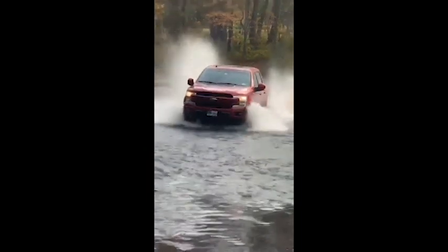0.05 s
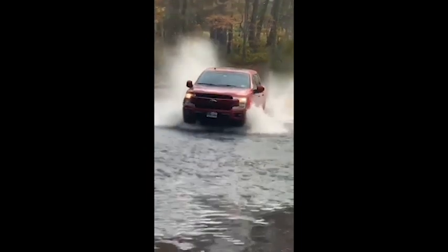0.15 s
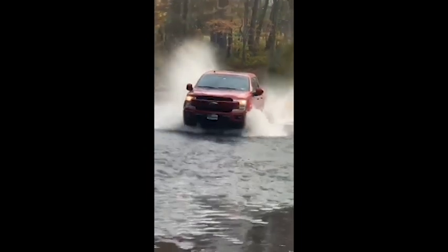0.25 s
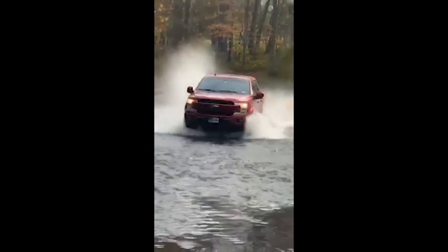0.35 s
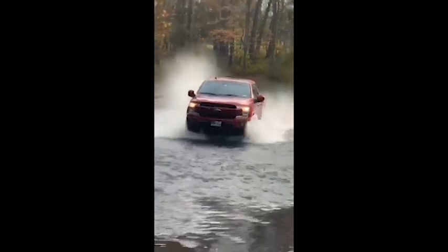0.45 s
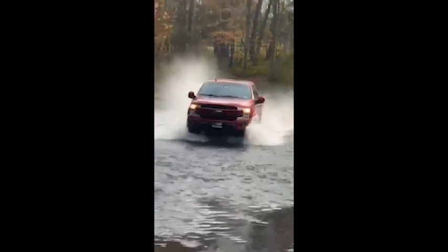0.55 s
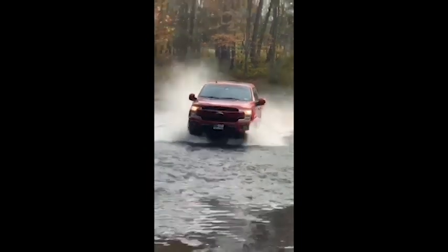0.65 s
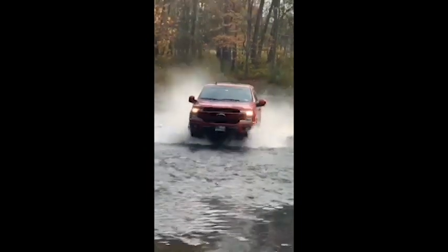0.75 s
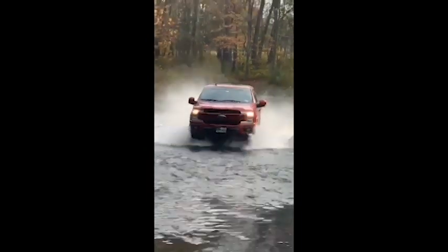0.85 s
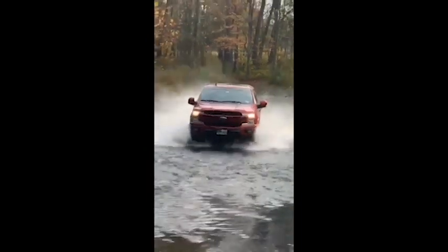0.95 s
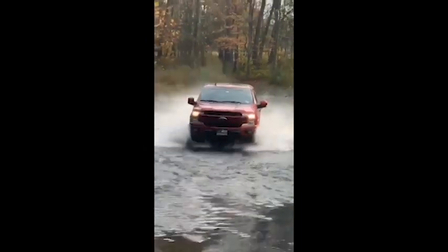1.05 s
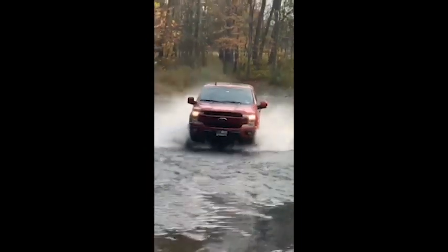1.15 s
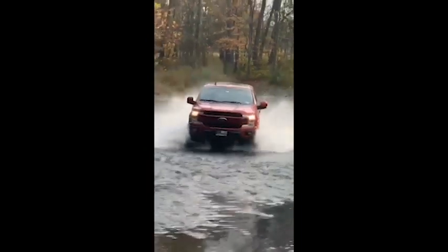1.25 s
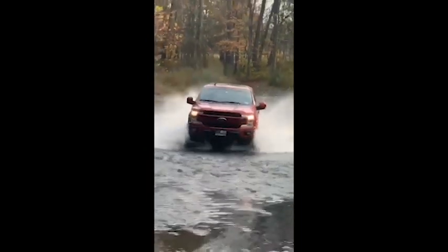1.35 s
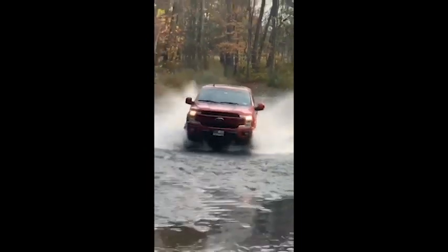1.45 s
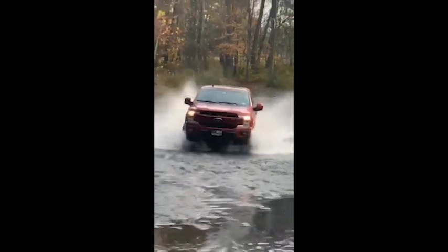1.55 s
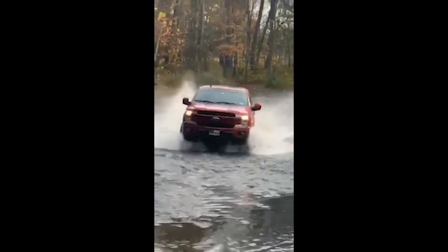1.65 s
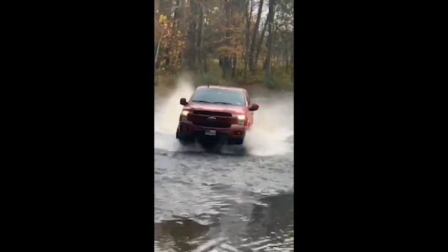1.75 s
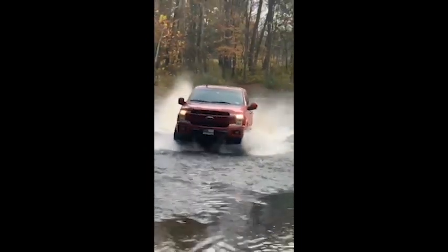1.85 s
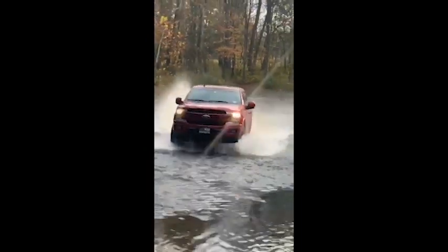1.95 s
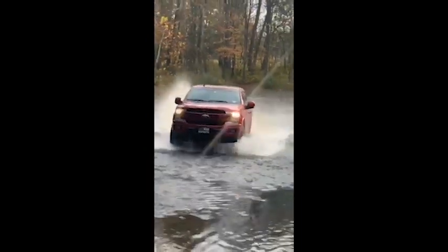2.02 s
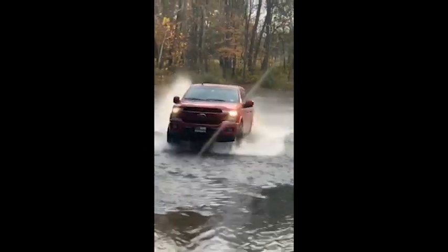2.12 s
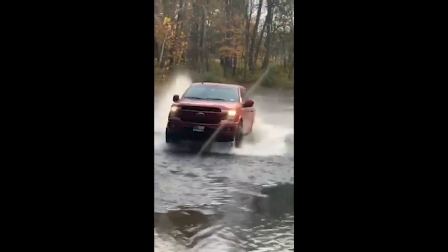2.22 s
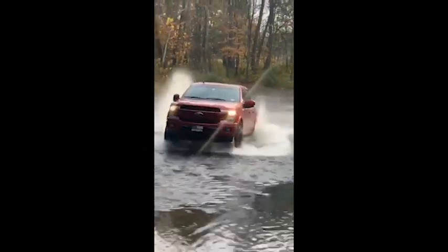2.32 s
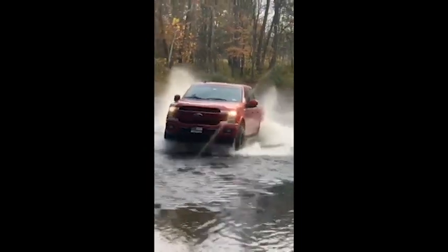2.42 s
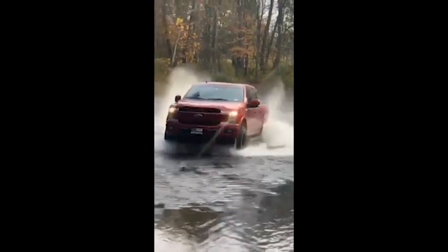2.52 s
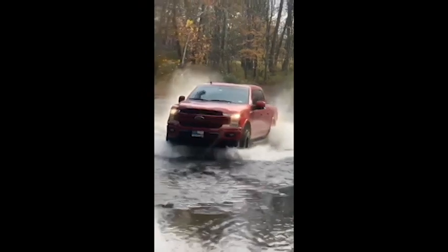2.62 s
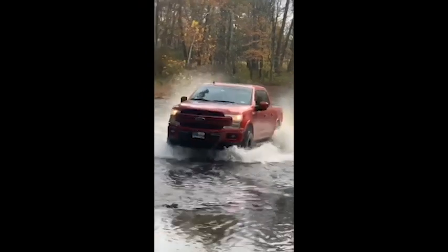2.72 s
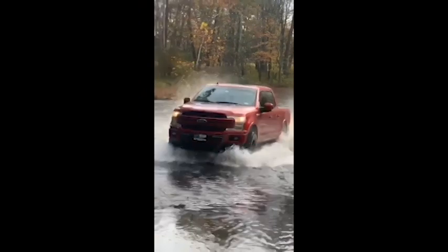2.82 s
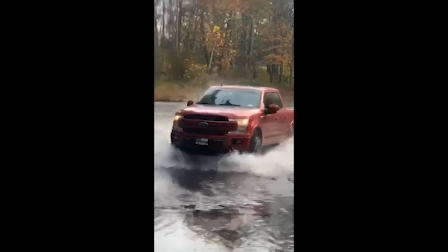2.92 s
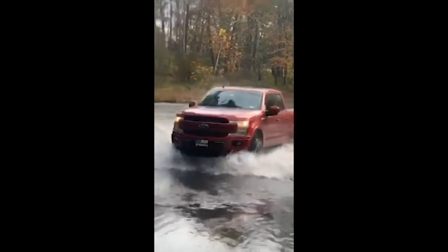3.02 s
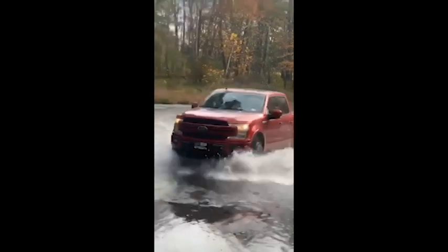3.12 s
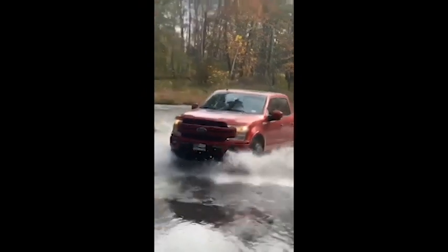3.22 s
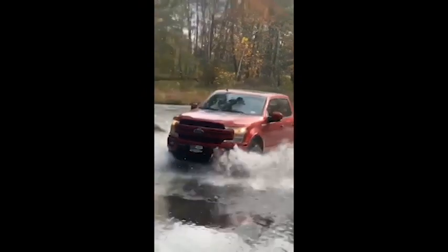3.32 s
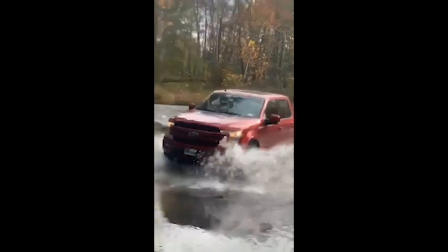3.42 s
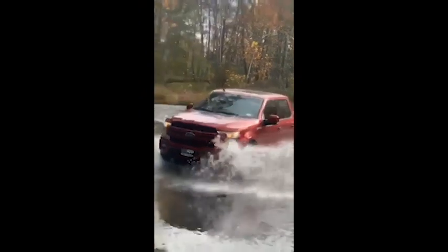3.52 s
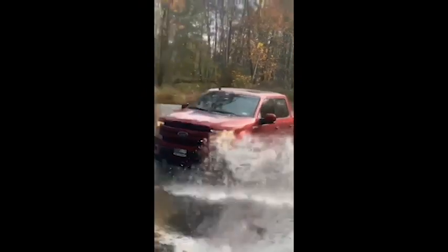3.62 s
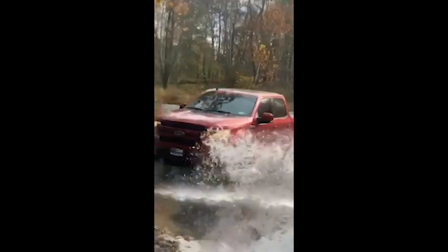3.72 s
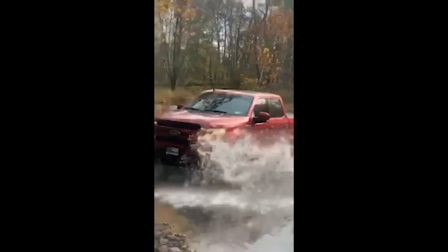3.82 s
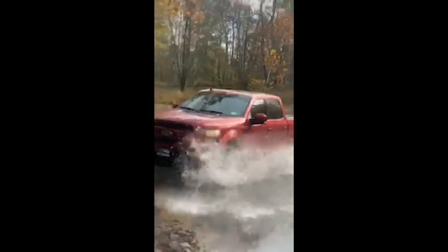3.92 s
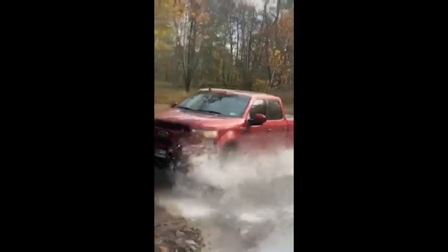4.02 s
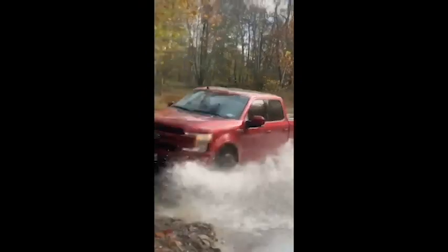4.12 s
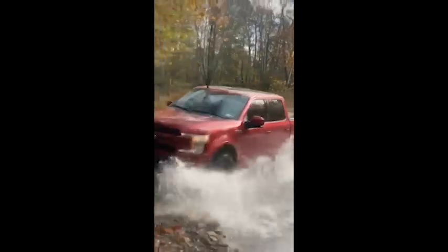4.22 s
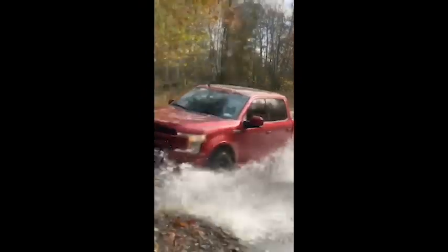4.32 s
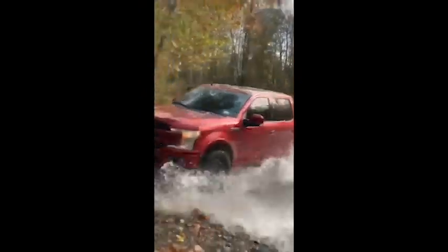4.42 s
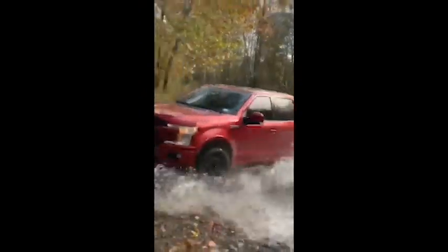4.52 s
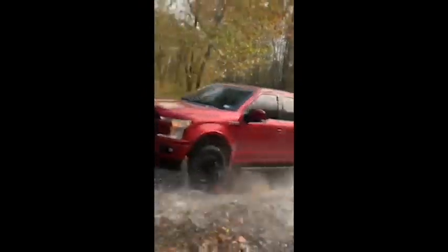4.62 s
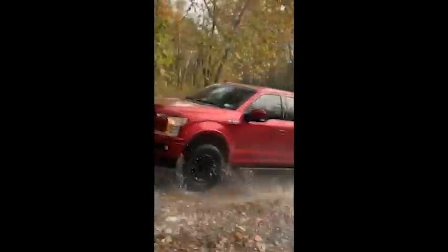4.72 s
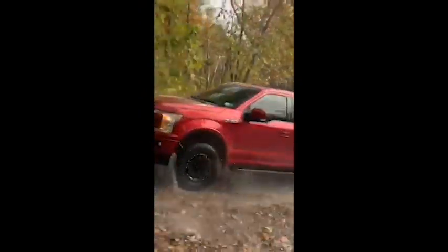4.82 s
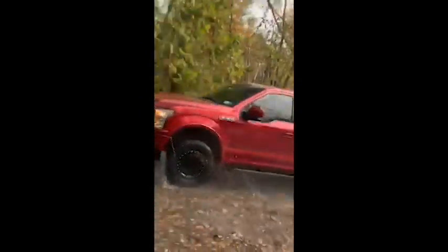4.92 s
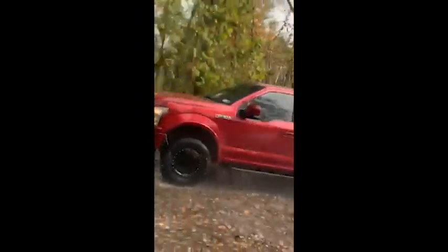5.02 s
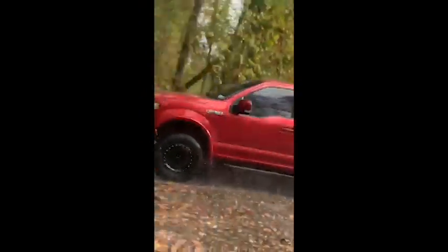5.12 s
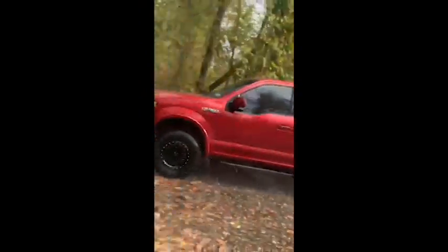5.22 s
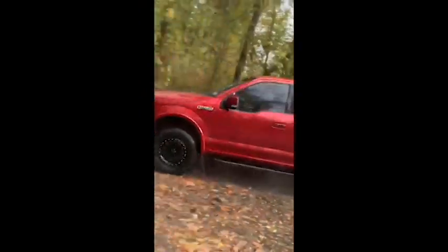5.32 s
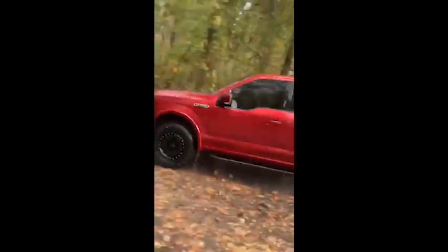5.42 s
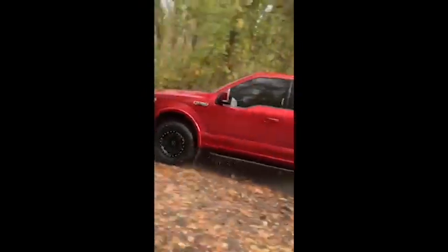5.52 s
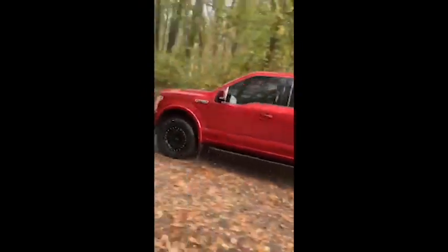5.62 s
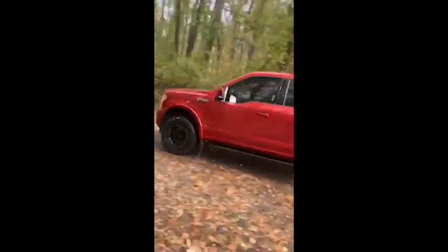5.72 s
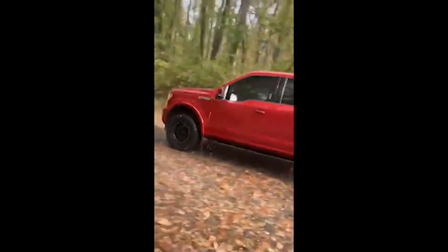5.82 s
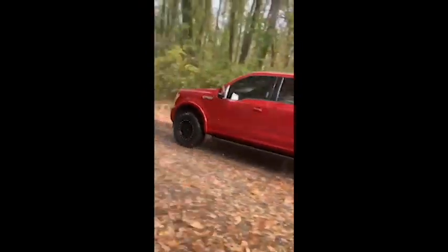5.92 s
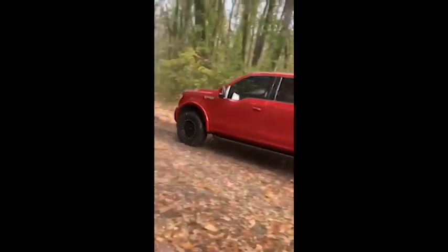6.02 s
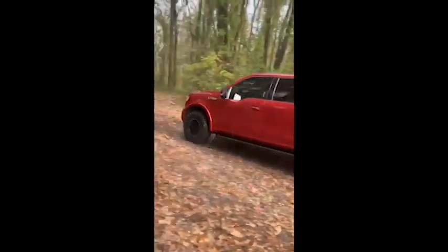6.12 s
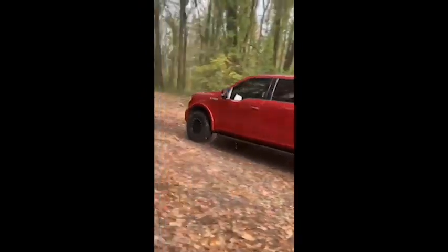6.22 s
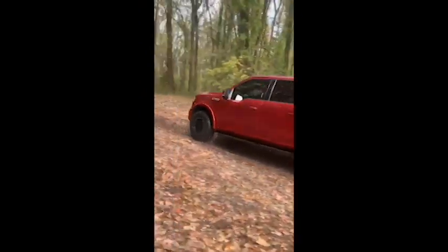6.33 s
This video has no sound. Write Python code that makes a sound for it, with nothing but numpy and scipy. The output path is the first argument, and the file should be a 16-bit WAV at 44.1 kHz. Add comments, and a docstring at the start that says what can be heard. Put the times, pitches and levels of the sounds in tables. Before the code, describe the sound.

Continuous churning water and a low, throbbing truck engine come nearer across a creek, captured close by on a small microphone with a hollow, slightly rough colour. Low booming beats on the wheel wells rise in pitch as bright slaps and spray increase. The loudest moment comes about five seconds in, with a heavy underbody blow; afterwards gritty crunches, small stone knocks and thinning spray replace the splash on the bank.

```python
"""A pickup fords a shallow creek, passes close by and climbs out onto a gravel track.
Thrown water drums on the underbody and falls back in splashes and spray: impact noise rung in bands of filters.
Slaps, thumps, gulped air and knocking stones are damped rings; the engine is a train of uneven pulses over rumble.
On the bank the spray thins out and the wet tyres crunch over stones, as bursts of filtered cracks."""
import sys
import numpy as np
from scipy import signal
from scipy.io import wavfile
from scipy.ndimage import uniform_filter1d

SR = 44100
rng = np.random.default_rng(int(sys.argv[2]) if len(sys.argv) > 2 else 0)


def materialize(psi):
    """Save the field psi as 16-bit PCM at rate SR to the path in sys.argv[1].

    A 1-D psi becomes a single channel; in a 2-D psi each row is a channel.
    """
    bounded = np.clip(np.atleast_2d(psi).T, -1, 1)
    quanta = np.round(bounded * 32767).astype(np.int16)
    wavfile.write(sys.argv[1], SR, quanta)


N = 280476

# the pass: moment when the truck is nearest, its distance then, its speed
CLOSEST_S, CLOSEST_M, SPEED_M_PER_S = 4.934, 2.146, 4.45
# the tyres climb out of the water: middle of the climb, time scale of the climb
ASHORE_S, CLIMB_S = 5.606, 0.44


def from_db(db):
    """Amplitude gain is ten to the power of a twentieth of the decibels."""
    return 10 ** (np.asarray(db) / 20)


def rms_one(x):
    """Normalisation by the root of the mean power gives unit rms."""
    return x / np.sqrt(np.mean(x ** 2) + 1e-20)


def in_time(rows):
    """Linear interpolation carries each column of a curve to every sample."""
    s, *columns = np.transpose(rows)
    return [np.interp(np.arange(N) / SR, s, c) for c in columns]


def drift(rate_hz):
    """Noise through a critically damped low-pass wanders slowly; rms 1."""
    step = 40  # samples between computed points
    r = np.exp(-2 * np.pi * rate_hz * step / SR)
    noise = rng.standard_normal(N // step + 2002)
    slow = signal.lfilter([1], [1, -2 * r, r * r], noise)[2000:]  # settled part only
    return np.interp(np.arange(N) / step, np.arange(len(slow)), rms_one(slow))


def band(x, low_hz, high_hz):
    """A Butterworth band-pass keeps only the energy between two frequencies."""
    sos = signal.butter(2, [low_hz, high_hz], "band", fs=SR, output="sos")
    return signal.sosfilt(sos, x + 1e-18)


def held(x, seconds=0.076):
    """Division by the short-term rms keeps loudness even over this span, while faster flutter remains."""
    power = np.abs(uniform_filter1d(x ** 2, max(int(seconds * SR), 2)))
    return x / np.sqrt(power + 1e-12)


def swell(s, db, half_s):
    """A Gaussian in time makes a bell-shaped rise (or dip, if db is negative) of the level."""
    return db * np.exp(-((np.arange(N) / SR - s) / half_s) ** 2)


def moving_peak(x, hz, width_hz, db, size=2048):
    """A second-order resonance makes a peak or notch whose centre and height move block by block."""
    half = np.pi * width_hz / SR
    out, state = np.zeros(N), np.zeros(2)
    for i in range(0, N, size):
        c = -2 * np.cos(2 * np.pi * hz[i] / SR)
        g = from_db(db[i] / 2)
        zeros, poles = [1 + half * g, c, 1 - half * g], [1 + half / g, c, 1 - half / g]
        out[i:i + size], state = signal.lfilter(zeros, poles, x[i:i + size], zi=state)
    return out


def distance_db(lag_s=0):
    """Spherical spreading: pressure falls as one over distance; 0 dB at the nearest point, lag_s late."""
    along_m = SPEED_M_PER_S * (np.arange(N) / SR - CLOSEST_S - lag_s)
    return -20 * np.log10(np.hypot(1, along_m / CLOSEST_M))


def ashore(lag_s=0):
    """A sigmoid in time goes smoothly from 0 in the creek to 1 on the bank."""
    return .5 + .5 * np.tanh(2 * (np.arange(N) / SR - ASHORE_S - lag_s) / CLIMB_S)


def impacts(per_s, spread_db):
    """Poisson-like arrivals: clicks of either sign, sizes scattered exponentially in dB; rms 1."""
    at = np.flatnonzero(rng.random(N) < per_s / SR)
    size_db = spread_db * np.minimum(rng.exponential(1, len(at)), 4)
    clicks = np.zeros(N)
    clicks[at] = from_db(size_db) * rng.choice([-1, 1], len(at))
    return rms_one(clicks)


def shower(tone, share, per_s, spread_db, patchy_db, surge_db, colour=lambda hz: 0, count=8):
    """Shot noise: impacts ring in a row of bands over a blur of noise; colour(hz) adds moving dB."""
    hz, tone_db = np.transpose(tone)
    edges = np.geomspace(hz[0], hz[-1], count + 1)
    out, power = 0, 0
    for low, high in zip(edges, edges[1:]):
        centre = np.sqrt(low * high)
        blur = np.sqrt(1 - share) * rng.standard_normal(N)
        drive = blur + np.sqrt(share) * impacts(per_s, spread_db)
        band_db = np.interp(np.log(centre), np.log(hz), tone_db) + colour(centre)
        gain = np.sqrt(high - low) * from_db(band_db)
        patches = from_db(patchy_db * drift(15.0))
        out = out + gain * rms_one(band(drive, low, high) * patches)
        power = power + gain ** 2
    return held(out / np.sqrt(power) * from_db(surge_db))


def blows(rows, ring_cycles, rise_cycles, scatter_s, scatter_db, scatter_octaves):
    """Damped resonance: a ring falls 60 dB in ring_cycles after a soft rise, with noise around its pitch."""
    out, t = np.zeros(N + SR), np.arange(SR // 4) / SR
    reach = 2 ** (scatter_octaves / 2)
    for s, level_db, hz in rows:
        ring = np.sin(2 * np.pi * hz * t) * from_db(-60 * t * hz / ring_cycles)
        noise = rms_one(band(rng.standard_normal(len(t)), hz / reach, hz * reach))
        scatter = noise * from_db(scatter_db - 60 * t / scatter_s)
        rise = 1 - np.exp(-(t * hz / rise_cycles) ** 2)
        blow, at = (ring + scatter) * rise, round(s * SR)
        out[at:at + len(t)] += from_db(level_db) * blow / np.abs(blow).max()
    return out[:N]


def patter(per_s, spread_db, decay_s, low_hz, high_hz):
    """Noise under exponential decays: sudden bursts at random moments, each falling 60 dB in decay_s; rms 1."""
    clicks = np.abs(impacts(per_s, spread_db)) + 1e-18
    bursts = signal.lfilter([1], [1, -from_db(-60 / (decay_s * SR))], clicks)
    return rms_one(band(bursts * rng.standard_normal(N), low_hz, high_hz))


def engine():
    """Pulse-train excitation: uneven firings boom in the exhaust over chassis rumble that deepens ashore."""
    # how hard the engine and chassis work: start_s, effort_db
    effort_curve = [(0, 0), (.45, -4), (1.0, -1), (1.7, 2), (2.05, 0.5), (2.5, 3), (3.05, -1), (3.65, -2),
                    (4.15, 1.5), (5.25, 0), (5.85, -5), (6.36, -6)]
    # relative rumble spectrum per Hz: frequency_hz, level_db
    rumble_tone = [(20, -25), (32, -10.5), (45, -4), (65, -2.5), (88, 2.5), (115, -5.5), (160, -15)]
    effort_db, = in_time(effort_curve)
    firing_hz = 67.8 - 0.25 * effort_db  # slower under more effort
    turns = np.cumsum(firing_hz * (1 + 0.0606 * drift(7.17))) / SR
    firings = np.diff(np.floor(turns), prepend=0) * from_db(3.7 * drift(29))
    exhaust = rms_one(band(firings, 48, 92))
    tilt_db = 1.0 - 4.9 * ashore(lag_s=-0.71)  # per octave
    rumble = shower(rumble_tone, share=0.22, per_s=60, spread_db=-0.5, patchy_db=0.5, surge_db=0,
                    colour=lambda hz: tilt_db * np.log2(hz / 65), count=7)
    level_db = -24.0 + 0.29 * distance_db() + effort_db + 0.75 * drift(8.3)
    return from_db(level_db) * held(from_db(-5.5) * exhaust + rumble, seconds=0.092)


def jolts():
    """Low structural modes: the chassis shudders over bumps in the bed and the bank."""
    # bumps, levels relative: start_s, level_db, pitch_hz
    bumps = [(3.13, -21, 72), (3.93, -18, 67.5), (4.92, -17, 69), (5.13, -14, 70), (5.35, -19, 68.5),
             (5.51, -17, 66.5)]
    return from_db(-2.0) * blows(bumps, ring_cycles=16, rise_cycles=3.6,
                                 scatter_s=0.2, scatter_db=-11, scatter_octaves=.8)


def crackle():
    """Brittle fracture: dry leaves and small stones snap in brief noise bursts once the tyres are ashore."""
    snaps = patter(per_s=35, spread_db=1.2, decay_s=0.015, low_hz=1300, high_hz=4300)
    return from_db(-35 + distance_db()) * ashore(lag_s=-0.23) * snaps


def crunches(decay_s=0.06, rise_s=0.0014, width_octaves=0.81, grains_per_s=2500):
    """Granular noise: a faint high tick, then grit crunches, each a short, dying run of cracks."""
    # a faint high tick, then grit cracking under the tyres, levels relative: start_s, level_db, pitch_hz
    crunch_rows = [(4.735, -20, 5000), (5.222, -7.5, 3600), (5.377, -11, 3600), (5.497, -13, 1950),
                   (5.604, -16, 2600), (5.622, -15, 2280), (5.786, -17.5, 2200), (5.798, -21, 3980),
                   (5.871, -27, 1900), (5.944, -25.5, 2150), (6.033, -28, 5160), (6.055, -30, 3800),
                   (6.070, -28, 3800), (6.149, -23, 2060), (6.164, -24.5, 3500), (6.277, -31, 3950),
                   (6.328, -34, 4100)]
    out, t = np.zeros(N + SR), np.arange(SR // 4) / SR
    reach = 2 ** (width_octaves / 2)
    envelope = from_db(-60 * t / decay_s) * (1 - np.exp(-t / rise_s))
    for s, level_db, hz in crunch_rows:
        cracks = (rng.random(len(t)) < grains_per_s / SR) * rng.standard_normal(len(t))
        crunch, at = band(cracks * envelope, hz / reach, hz * reach), round(s * SR)
        out[at:at + len(t)] += from_db(level_db) * crunch / np.abs(crunch).max()
    return from_db(-6.5) * out[:N]


def stones():
    """Impact of solids: stones knock under the tyres as short, strongly damped rings."""
    # knocks, levels relative: start_s, level_db, pitch_hz
    knocks = [(5.036, -2, 690), (5.052, -1.5, 706), (5.080, -5, 690), (5.143, -7, 720), (5.158, -4, 725),
              (5.620, -12, 1370), (5.787, -11.5, 1390), (5.994, -14, 634), (6.002, -7.5, 665),
              (6.022, -19, 660), (6.107, -18, 1370), (6.117, -18, 1250), (6.149, -14, 1290),
              (6.158, -21, 1400), (6.262, -23, 740), (6.299, -22, 720), (6.345, -24, 750)]
    return from_db(-7) * blows(knocks, ring_cycles=15, rise_cycles=1.55,
                               scatter_s=0.069, scatter_db=-15.5, scatter_octaves=1.0)


def spatter():
    """Discrete drop impacts: lumps of water land one by one while the truck is in the creek."""
    lumps = patter(per_s=60, spread_db=.6, decay_s=.025, low_hz=700, high_hz=2110)
    return from_db(-30 + distance_db()) * (1 - ashore()) * lumps


def spray(grain):
    """Dense drop impacts merge into hiss: droplets patter, the finest fizz, and both thin out ashore."""
    # relative spectra per Hz: frequency_hz, level_db
    spray_tone = [(1800, -9), (2500, 1), (3100, 1), (4100, -1), (5200, -3), (6300, -6), (7500, -16.5)]
    mist_tone = [(5500, -15), (7000, 10), (8000, 8), (9500, -23)]
    # bursts of spray flung towards the microphone: centre_s, swell_db, half_length_s
    spray_bursts = [(3.664, 1.5, 0.024), (4.372, 2.5, 0.073), (4.946, 1, 0.036), (5.232, 3, 0.037),
                    (5.8, 5, .02)]
    # fine mist flicked off the treads: centre_s, swell_db, half_length_s
    mist_flicks = [(4.348, 2, 0.085), (5.378, 6, .03), (5.49, 6, .04), (5.716, 7, 0.055),
                   (5.95, 4.5, 0.014), (6.038, 2, .012)]
    # both hang in the air before they land, so their levels lag the truck
    spray_hang_s, mist_hang_s = 0.084, 0.2
    near_db, dried = distance_db(spray_hang_s), ashore(lag_s=0.16)
    tilt_db = 0.5 + 0.13 * near_db - 2.2 * dried  # per octave
    flutter = drift(25) + .6 * drift(4)
    drops = shower(spray_tone, grain, per_s=1300, spread_db=1.0, patchy_db=1.45, surge_db=.35 * flutter,
                   colour=lambda hz: tilt_db * np.log2(hz / 4000), count=10)
    mist = shower(mist_tone, grain, per_s=1800, spread_db=2.0, patchy_db=3.0,
                  surge_db=0.53 * flutter, count=4)
    bursts_db = sum(swell(*burst) for burst in spray_bursts)
    flicks_db = sum(swell(*flick) for flick in mist_flicks)
    drops_db = -29.5 + 0.55 * near_db - 9.7 * dried + bursts_db
    mist_db = -39.5 + 1.02 * distance_db(mist_hang_s) - 5.8 * dried + flicks_db
    return from_db(drops_db) * drops + from_db(mist_db) * mist


def slaps():
    """Trapped-air resonance: sheets of water slap down and the air beneath them rings."""
    # slaps, levels relative: start_s, level_db, pitch_hz of the trapped air
    sheets = [(2.786, -27, 1900), (2.931, -21, 1190), (3.284, -16, 1160), (3.400, -20.5, 720),
              (3.402, -18, 1230), (3.542, -18, 1950), (3.593, -19, 1180), (3.628, -20, 1330),
              (3.631, -21, 1950), (3.843, -15.5, 1140), (3.893, -23, 1940), (3.900, -18.5, 716),
              (3.948, -20, 763), (3.953, -9.5, 1170), (4.070, -21, 2090), (4.221, -13.5, 743),
              (4.224, -18, 2040), (4.357, -16, 1930), (4.394, -18, 754), (4.396, -12, 1193),
              (4.456, -10, 1315), (4.465, -17, 735), (4.577, -14, 740), (4.594, -9.5, 1250),
              (4.666, -16, 1246), (4.753, -14.5, 2020), (4.790, -10.5, 1265), (4.865, -13, 714),
              (4.899, -18, 2000), (4.930, -12, 1260), (5.052, -15, 1280), (5.101, -13, 1260),
              (5.116, -13, 2040), (5.135, -17, 2090), (5.14, -16, 1360), (5.288, -12, 1200),
              (5.520, -18, 1257)]
    return from_db(-3.0) * blows(sheets, ring_cycles=29, rise_cycles=2.7,
                                 scatter_s=0.11, scatter_db=-14.5, scatter_octaves=1.0)


def gulps():
    """Bubble resonance: pockets of air gulped under the wheel wells each sound a short low note."""
    # air pockets, levels relative: start_s, level_db, pitch_hz
    pockets = [(.765, -20, 126), (1.43, -15.5, 210.6), (1.665, -15, 150), (2.05, -15, 219.6),
               (2.16, -10.5, 200), (2.345, -14.5, 278), (2.57, -15, 253), (2.64, -18, 262),
               (3.80, -15.5, 311), (3.88, -20, 321), (4.075, -19, 282), (4.455, -10.5, 298),
               (4.57, -12.5, 216.2), (4.62, -11, 318), (4.76, -16, 297), (4.82, -12.5, 340),
               (4.97, -17, 340)]
    return from_db(-2.0) * blows(pockets, ring_cycles=45, rise_cycles=5.7,
                                 scatter_s=0.25, scatter_db=-12, scatter_octaves=0.37)


def thumps():
    """Struck-panel modes: heavy blows on the underbody ring for only a few cycles."""
    # blows, levels relative: start_s, level_db, pitch_hz
    underbody = [(.408, -13, 200), (.824, -14, 150), (1.030, -13, 204), (1.528, -10, 184),
                 (1.766, -11.5, 175), (1.944, -9.5, 214), (2.234, -10, 220), (2.363, -9.5, 160),
                 (2.378, -4, 253), (2.790, -14.5, 225), (3.259, -9, 255), (3.755, -9, 256),
                 (3.908, -9, 350), (3.997, -6.5, 216), (4.258, -5, 228), (4.447, -7.5, 256),
                 (4.620, -5.5, 253), (4.734, -5.5, 256), (4.818, -7.5, 150), (5.147, -13, 302),
                 (5.171, 3, 350), (5.604, -12, 245), (5.915, -14.5, 240), (6.003, -20, 420)]
    return from_db(-2.0) * blows(underbody, ring_cycles=8.2, rise_cycles=0.6,
                                 scatter_s=0.059, scatter_db=-11.0, scatter_octaves=1.6)


def splash(churn_db, grain):
    """Many bubble resonances: torn water falls back in clumps of short rings, grainier on the bank."""
    # relative spectrum per Hz: frequency_hz, level_db
    splash_tone = [(300, -5.5), (480, 2.5), (680, -0.5), (1000, -4), (1350, -5), (1900, -6.5),
                   (2400, -12.5), (3200, -24.5)]
    near_db = distance_db()
    # per octave: big, low bubbles carry best close by; the tyres flick finer water as they climb out
    tilt_db = -.2 - 0.035 * near_db + swell(ASHORE_S, db=3.5, half_s=0.19)
    # each clump lands at once and trickles away
    clump_s, clump_share = .012, .09
    clump_starts = np.abs(impacts(per_s=24, spread_db=-1.5))
    landings = signal.lfilter([1], [1, -np.exp(-1 / (clump_s * SR))], clump_starts)
    clumps_db = 20 * np.log10(1 + clump_share * rms_one(landings)) + .5 * drift(35)
    bubbles = shower(splash_tone, grain, per_s=350, spread_db=0.0, patchy_db=0.6, surge_db=clumps_db,
                     colour=lambda hz: tilt_db * np.log2(hz / 1000), count=12)
    return from_db(-19.0 + 0.96 * near_db + churn_db + .5 * drift(12)) * bubbles


def drumming(churn_db):
    """Cavity resonance: slugs of water beat on booming wheel wells, harder in tone as the truck nears."""
    # relative spectrum per Hz: frequency_hz, level_db
    drum_tone = [(70, -19), (100, -0.5), (140, -1), (210, 0), (290, -2.5), (380, -6.5), (480, -10),
                 (620, -21)]
    # centre of the boom before it wanders: start_s, pitch_hz
    boom_curve = [(0, 158), (.7, 132), (1.8, 183), (2.2, 208), (2.5, 264), (3.8, 304), (4.1, 262),
                  (4.5, 306), (5.15, 347), (5.9, 250)]
    # brief surges and dips of the drumming: centre_s, change_db
    change_rows = [(.48, 3), (.83, 2), (1.45, 1), (1.55, 2.5), (1.71, 0), (1.88, 4.5), (2.08, -0.5),
                   (2.19, -1), (3.28, 4), (3.91, 7.5), (4.0, 4), (4.26, -2), (4.484, 5), (4.57, 1.5),
                   (5.17, 0)]
    # the boom wanders as the water sloshes
    boom_hz = in_time(boom_curve)[0] * 2 ** (.08 * drift(6.7))
    boom_db, width_octaves = 5.5, .33
    near_db = distance_db()
    tilt_db = 3.0 * from_db(near_db / 2) - 1.8  # per octave

    def colour(hz):
        """A spectral tilt plus a resonance peak at the boom."""
        offset = np.log2(hz / boom_hz) / width_octaves
        return tilt_db * np.log2(hz / 200) + boom_db / (1 + offset ** 2)

    beats = shower(drum_tone, share=0.48, per_s=160, spread_db=2.0, patchy_db=1.73,
                   surge_db=1.0 * drift(35), colour=colour, count=11)
    changes_db = sum(swell(s, db, half_s=0.013) for s, db in change_rows)
    return from_db(-16.5 + 0.46 * near_db + churn_db + changes_db + 0.89 * drift(4.9)) * beats


def scene():
    """Superposition: the truck, its wake and the stones it rolls over add up."""
    # what the water at the wheels throws: start_s, drumming_db on the body, splash_db
    churn_curve = [(0, 1, 3.5), (.65, -1, 2), (1.3, 3, 0), (2.4, 4, 4), (2.65, 0, 4), (2.95, -9, 2.5),
                   (3.2, -5, 2), (3.6, -10, -1.5), (3.95, -4, 0.5), (4.3, -3, -3), (4.65, -0.5, -1),
                   (4.95, -1, -0.5), (5.165, -2, 3.5), (5.21, -5.5, 0.5), (5.35, -6.5, -0.5),
                   (5.8, -14.5, -6.5), (6.36, -17.5, -8.5)]
    drum_db, splash_db = in_time(churn_curve)
    # share of the wheel noise that is separate drops and grit: 0.29 in the creek, 0.64 on the bank
    grain = 0.29 + (0.64 - 0.29) * ashore(lag_s=-0.34)
    chassis = engine() + jolts() + thumps()
    ground = crackle() + crunches() + stones()
    wake = spatter() + spray(grain) + slaps() + gulps() + splash(splash_db, grain) + drumming(drum_db)
    return (chassis + ground + wake)[None]


def record(dry):
    """Port resonances shift as the microphone turns; saturation rounds peaks and a low-pass cuts the top."""
    # which way the microphone faces: start_s, facing (0 creek, 1 bank)
    facing_curve = [(0, .15), (2.2, 0.013), (3.35, 0.22), (3.6, 0.25), (4.55, 0.28), (5.1, 0.83), (6.36, 1)]
    # hollow colour of the microphone port: creek_hz, bank_hz, width_hz, creek_db, bank_db
    port_peaks = [(499.4, 508, 106, -14, -12.5), (730, 650, 240, 2.5, 4), (938, 930, 125, -2.5, -3.5),
                  (1160, 1275, 250, 4, 4), (1500, 1700, 305, -5.5, -3.5), (1750, 2390, 250, 4.5, 1.5),
                  (2150, 2600, 420, -4.5, 0), (2664, 2635, 260, -5.5, -10.5), (3060, 3220, 130, 0, 3.5),
                  (3420, 3400, 420, -4.5, -1), (3740, 4900, 350, 5, -0.5), (4350, 5600, 230, -2.5, -6),
                  (4620, 5700, 260, 3.5, 4), (5220, 4900, 460, -6.5, 2.5), (5740, 6550, 380, 5, 0),
                  (6810, 6200, 280, 6, -7.5), (6960, 7700, 420, -6.5, -2), (8730, 8850, 250, 14, 7.5)]
    x, (facing,) = dry[0], in_time(facing_curve)
    for creek_hz, bank_hz, width_hz, creek_db, bank_db in port_peaks:
        hz = creek_hz + (bank_hz - creek_hz) * facing
        db = creek_db + (bank_db - creek_db) * facing
        x = moving_peak(x, hz, width_hz, db)
    top = .95
    x = top * np.tanh(x / top)
    # order 10, .3 dB ripple, 70 dB stop band, cutoff in Hz
    return signal.sosfilt(signal.ellip(10, .3, 70, 9150, fs=SR, output="sos"), x)[None]


dry = scene()
out = record(dry)
materialize(out)
```